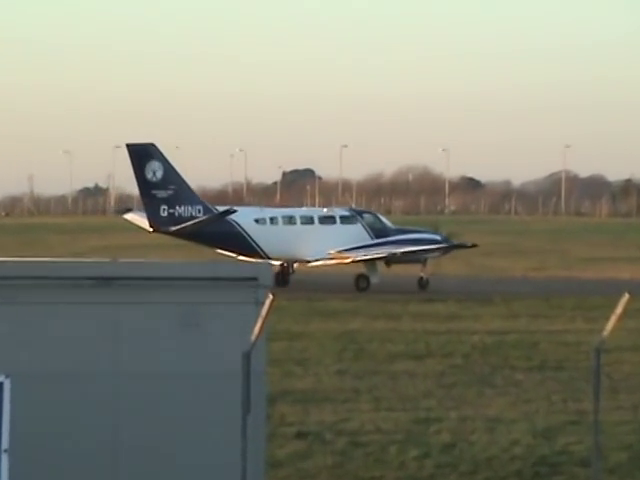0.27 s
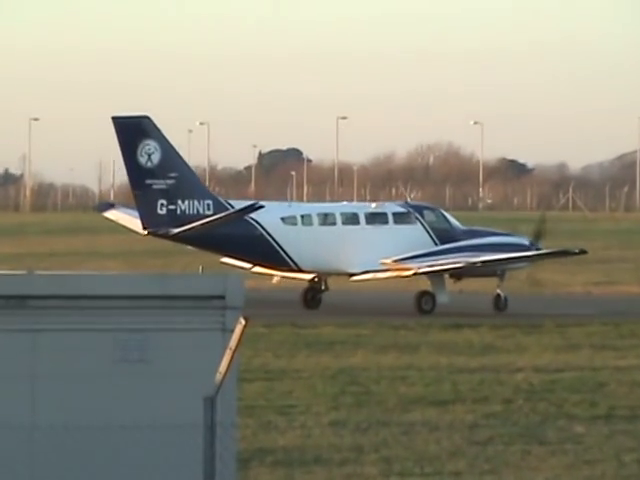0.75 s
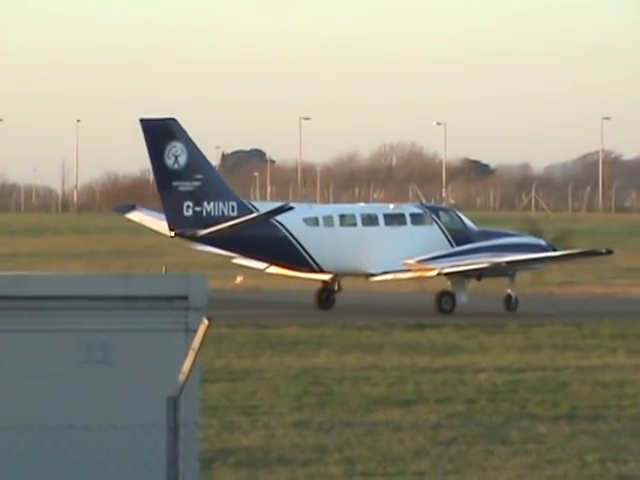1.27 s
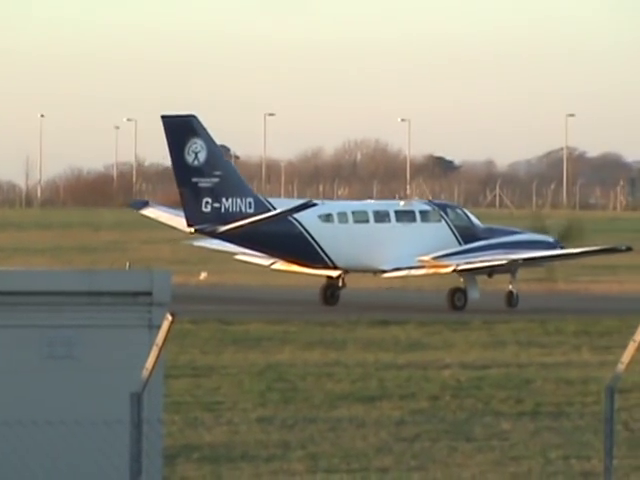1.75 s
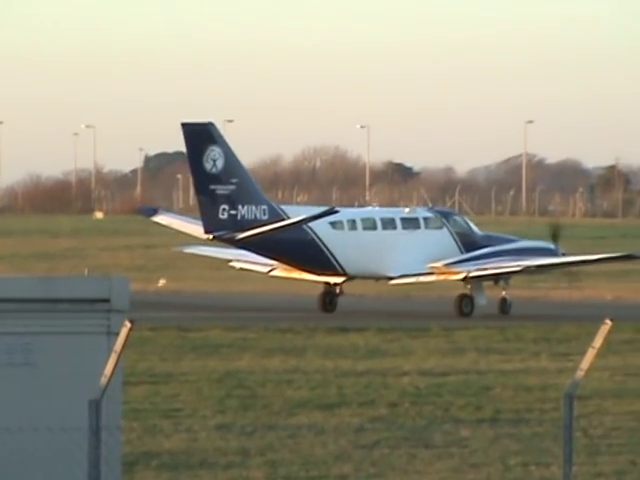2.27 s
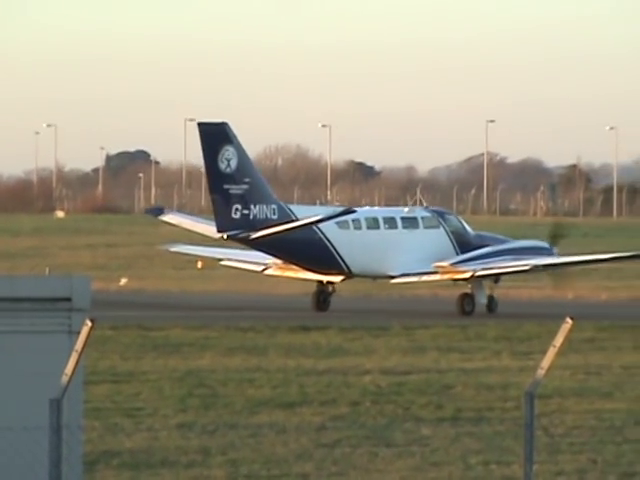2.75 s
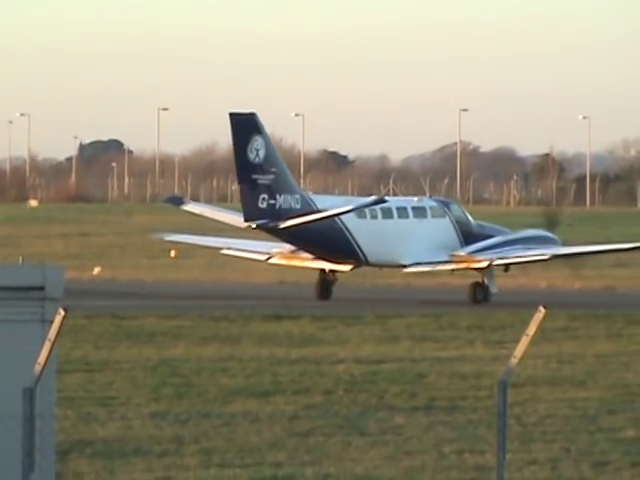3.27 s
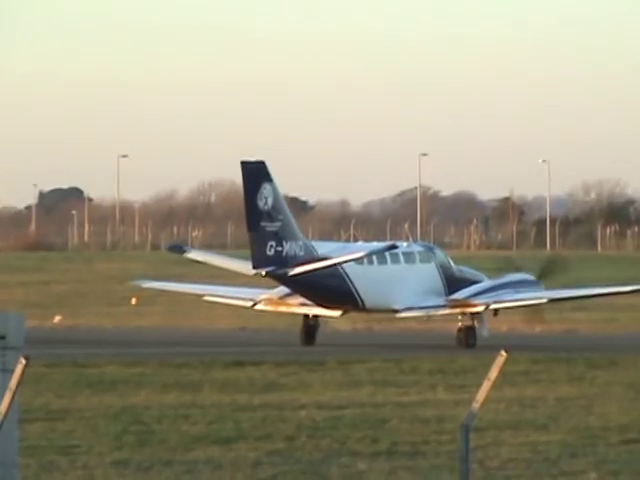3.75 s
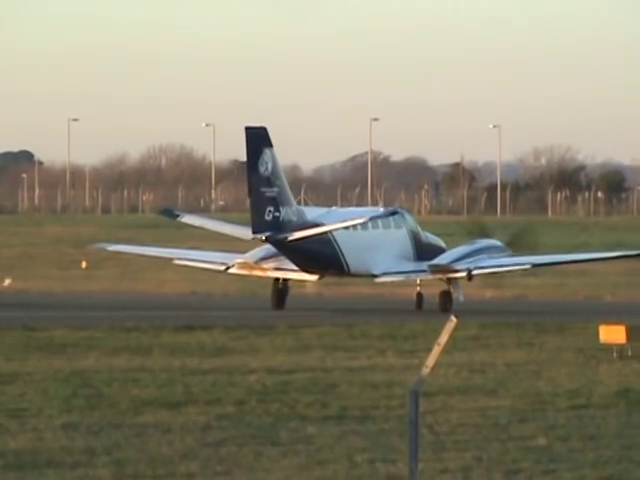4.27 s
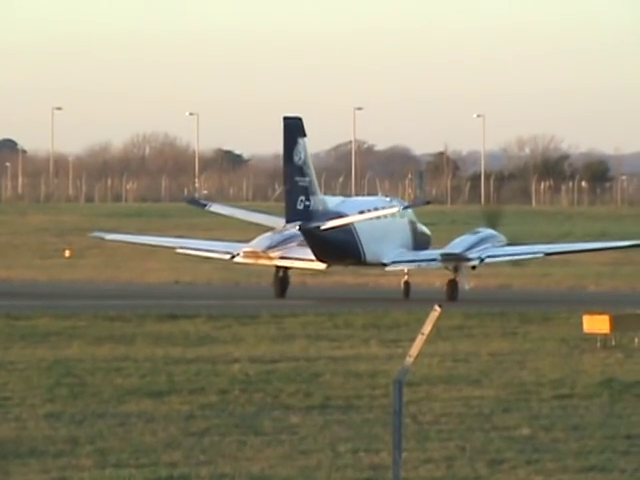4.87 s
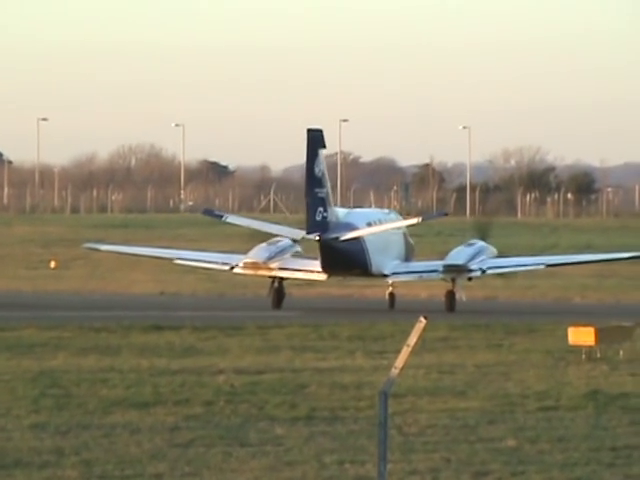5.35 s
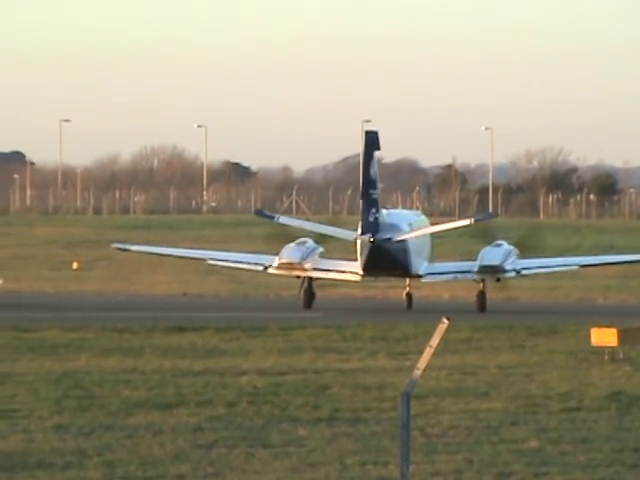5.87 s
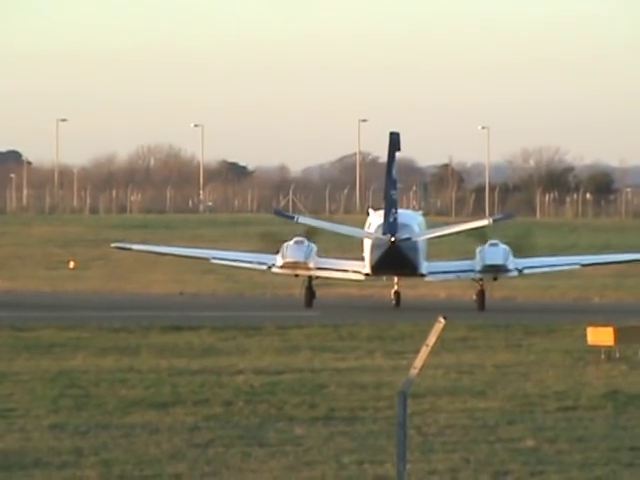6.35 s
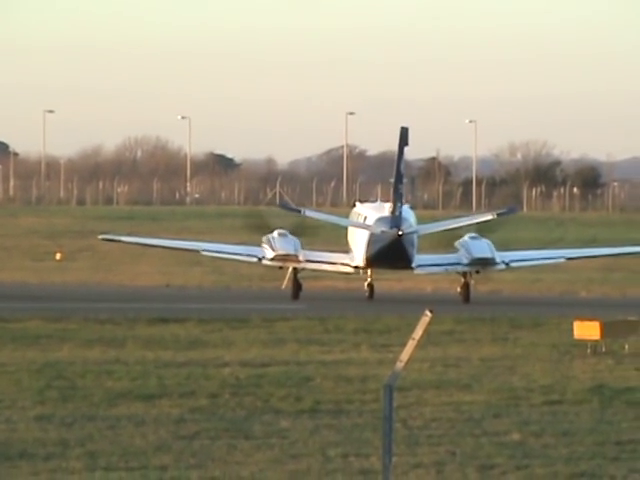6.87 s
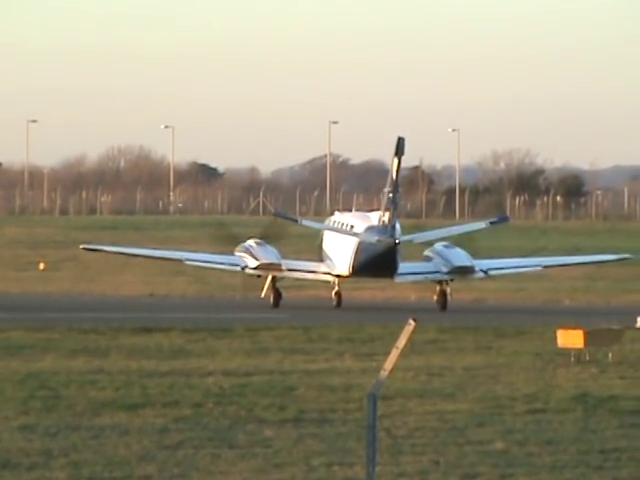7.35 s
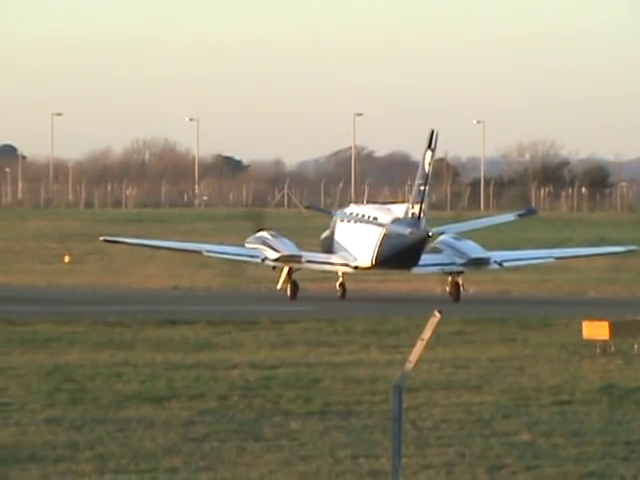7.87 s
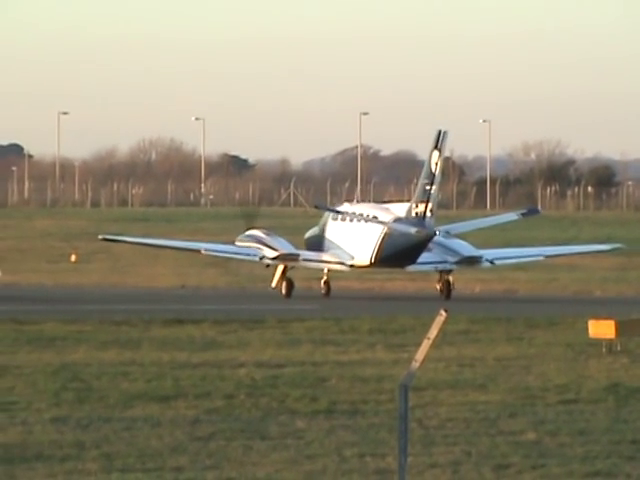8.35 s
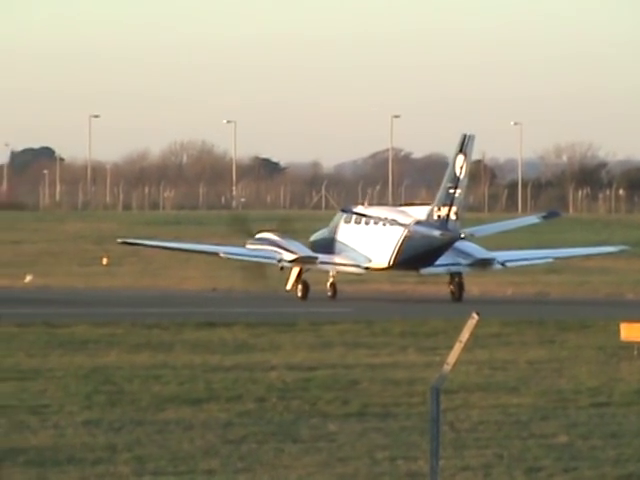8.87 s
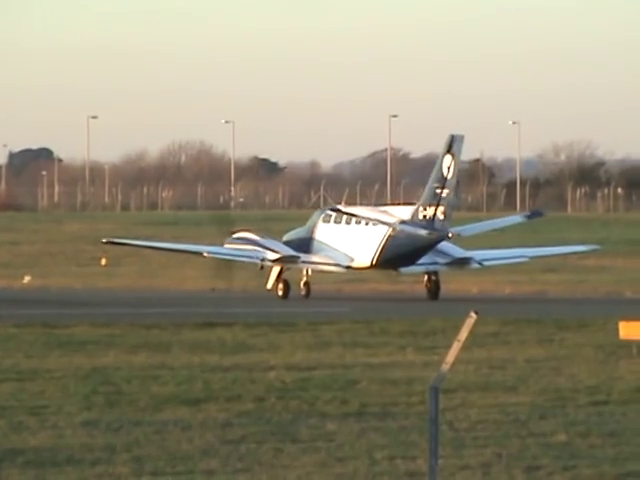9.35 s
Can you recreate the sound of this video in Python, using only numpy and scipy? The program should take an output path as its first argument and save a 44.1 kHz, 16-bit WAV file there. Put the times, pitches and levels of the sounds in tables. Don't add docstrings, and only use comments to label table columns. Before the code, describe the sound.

Outdoors on a grass airfield, a small twin-propeller aircraft taxis by with a rough, fluttering drone. Rapid bright exhaust ticks and metallic clatter stand out early, then fade as its tail swings toward the listener and the roar grows smoother. Wind buffets the camera microphone near the middle, with low thumps. Late on, a bird chirps faintly to the right over the continuing engines.

```python
import sys
import numpy as np
from scipy import signal
from scipy.fft import rfft, irfft, next_fast_len
from scipy.io import wavfile
from scipy.ndimage import uniform_filter1d

SR = 44100
rng = np.random.default_rng(int(sys.argv[2]) if len(sys.argv) > 2 else 0)


def gain_from_decibels(decibels):
    exponent = np.asarray(decibels, float) / 20
    return 10 ** exponent


def wav_record(signal):
    frames = np.transpose(np.atleast_2d(signal))
    bounded = np.clip(frames, -1, 1)
    quanta = np.round(bounded * 32767).astype(np.int16)
    wavfile.write(sys.argv[1], SR, quanta)


N = 423801
TIME = np.arange(N) / SR
STEP = 16

CYLINDERS_DB = [1, 1.5, -3, 1, -5, -0.5]


def aircraft():
    # [t/s, firings per s]
    near_rate = [(0.0, 51.364), (0.8, 52.074), (2.0, 52.545), (3.2, 53.678), (3.6, 53.686), (4.4, 54.579),
                 (5.2, 55.819), (6.0, 56.071), (6.4, 55.654), (7.2, 56.584), (8.0, 56.339), (9.61, 57.11)]
    far_rate = [(0.0, 51.394), (0.8, 51.194), (2.0, 50.683), (2.4, 50.899), (3.2, 50.494), (4.0, 51.006),
                (4.8, 50.735), (6.0, 51.693), (6.4, 52.245), (7.6, 52.366), (8.0, 52.93), (9.61, 53.215)]
    # [order of the six-firing cycle, heading/deg, half-width/deg, level/dB]
    near_lobes = [(6, 83, 14, -42), (6, 33, 23, -30), (6, -15, 63, -32.5), (12, 63, 22, -28),
                  (12, 13, 28, -26.5), (12, -22.5, 35, -27.5), (15, 85.5, 5.9, -38), (15, 43, 7.4, -34),
                  (15, 31, 28, -30), (15, -2, 15, -32), (15, -57.5, 8, -34), (18, 74, 10.2, -24),
                  (18, 48, 23.6, -26), (18, -3, 23, -38.5), (18, -57, 19, -41)]
    far_lobes = [(6, 84, 14, -40), (6, 49, 29, -34), (6, -52.5, 70, -36), (12, 54.5, 27, -37),
                 (12, 19.5, 19, -32.5), (12, -17.5, 15, -34), (12, -50, 10, -45.5), (15, 52, 6, -46.5),
                 (15, 3, 18, -50), (15, -22, 5.6, -38.5), (18, 83.5, 12, -25.5), (18, 49, 25.7, -26.5),
                 (18, 11, 28, -29.5), (18, -58.5, 30.5, -32.5)]
    # [t/s, level/dB]
    noise_level = [(0.0, -33), (0.05, -37), (0.18, -34), (0.21, -35), (1.15, -35), (1.18, -34.5),
                   (1.23, -35.5), (1.58, -35.5), (2.03, -38.5), (2.06, -35.5), (2.14, -37), (4.28, -37),
                   (5.24, -34.5), (6.4, -37), (7.15, -42.5), (7.9, -39), (8.08, -40), (9.61, -40.5)]
    near = firings(near_rate, 0.36)
    far = firings(far_rate, 0)
    level_db = curves(noise_level)[0]
    air_db = 0.75 * wobble(11)
    sound = exhaust_ticks(near) + clatter(near) + roar(near, level_db + air_db)
    sound = tailplane_shade(sound)
    sound += propellers(near, far, level_db + air_db) + rumble() + wing_wash(air_db)
    return sound, exhaust(near, near_lobes) + exhaust(far, far_lobes)


def firings(rate, start):
    return start + np.cumsum(curves(rate)[0]) / SR


def exhaust(fired, lobes):
    # [order, level/dB re the nearer of orders 12 and 18]
    uneven = [(3, -37), (5, -14.5), (7, -16), (8, -17), (9, -14.5), (10, -24), (13, -16), (16, -9),
              (17, -9.5), (20, -19.5), (21, -16.5), (22, -19), (23, -17.5), (24, -17.5), (25, -18),
              (26, -28.5), (32, -38.5)]
    strong = {}
    for k in (6, 12, 15, 18):
        strong[k] = beam([row[1:] for row in lobes if round(row[0]) == k])[::STEP]
    out = 0
    for order in range(3, 33):
        turn = np.pi / 3 * order * fired[::STEP]
        lag = 0.42 * max(order - 12, 0) - 2.1 * (order % 2)
        drift, luck = wobble(4, size=STEP), rng.uniform(0, 2 * np.pi)
        if order in strong:
            level_db = strong[order] + 0.5 * drift
            phase = turn - lag + 0.053 * wobble(11, size=STEP)
        else:
            high = np.clip((order - 12) / 6, 0, 1)
            level_db = (1 - high) * strong[12] + high * strong[18]
            level_db = level_db + np.interp(order, *np.round(np.transpose(uneven))) + 1.6 * drift
            phase = turn - (luck if order % 3 else lag) + 0.3 * wobble(2, size=STEP)
        out += gain_from_decibels(level_db) * np.cos(phase)
    return gain_from_decibels(3) * signal.resample_poly(out, STEP, 1, padtype="edge")[:N]


def exhaust_ticks(near):
    # [f/Hz, level/dB per Hz]
    colour = [(2500, -30.5), (4500, 5), (6000, 0.5), (8000, 2), (9300, -5), (10500, -21.5), (12500, -41)]
    # [heading/deg, half-width/deg, level/dB]
    lobes = [(68.5, 9, -48), (55.5, 12.5, -51), (40, 14, -53), (9, 20, -56.5), (-26, 22, -73),
             (-56, 6, -60.5)]
    # [t/s, half-length/s, level/dB]
    surges = [
        (.1, 0.058, -6),
        (.48, 0.1, 6),
        (1.16, 0.13, 5.5),
        (1.68, 0.12, 4.5),
        (2.06, .04, 2.5),
        (2.55, 0.19, -2.5),
        (2.95, 0.24, 4.5),
        (4.03, 0.017, 9.5),
    ]
    count = near + 0.17
    puffs = bursts(count, rise=0.16, fall=0.27, scatter_db=3, pattern_db=CYLINDERS_DB)
    level_db = beam(lobes) + swells(surges) - 1 + 0.3 * wobble(27)
    sound = gain_from_decibels(level_db) * hiss(colour, puffs, echo_hz=695, bounce=0.24)
    dull = filtered(sound, lambda hz: 1 / (1 + (hz / 6470) ** 12))
    chance = np.clip(rng.standard_normal(600), -1.5, 1.5)[np.floor(count).astype(int)]
    tilt_db = 4.5 * chance + 1 - side_view()
    return dull * gain_from_decibels(-tilt_db) + (sound - dull) * gain_from_decibels(tilt_db)


def clatter(near):
    # [f/Hz, level/dB per Hz]
    colour = [(900, -36), (1500, -11), (2200, 6), (3200, 9), (4500, -2.5), (6000, -47.5)]
    # [heading/deg, half-width/deg, level/dB]
    lobes = [(70.5, 0.24, -33.5), (69.5, 4.1, -41.5), (62, 15, -48.5), (18, 23, -47), (-54, 8.3, -55)]
    clacks = bursts(near + 0.22, rise=0.13, fall=0.47, scatter_db=3.5, pattern_db=CYLINDERS_DB)
    level_db = beam(lobes) + 1.2 * wobble(2.6)
    return gain_from_decibels(level_db) * hiss(colour, 0.1 + clacks, echo_hz=704, bounce=0.47)


def roar(near, level_db):
    # [f/Hz, level/dB per Hz]
    side_colour = [(180, -39), (300, 0.5), (399, -5.5), (811, 0.5), (1060, -9.5), (1200, 2), (1620, -2),
                   (2130, -4.5), (2440, -8.5), (2790, -3.5), (4590, -22.5), (8390, -23.5), (11000, -48),
                   (14300, -76), (22000, -120)]
    astern_colour = [(180, -57), (300, -10), (471, -2), (609, -4.5), (1020, -3.5), (1130, -5), (2550, -14),
                     (2790, -15.5), (7320, -27), (11000, -42), (14300, -71), (22000, -120)]
    # [f/Hz, width/Hz, lift/dB]
    cowl = [(650, 52, -5), (820, 25, 3.5), (1350, 96, 1.5), (2140, 78, 5), (2760, 110, 1)]
    # [heading/deg, half-width/deg, level/dB re the engine noise]
    lobes = [(67.5, 59.5, 0.5), (-11.5, 19.6, 0.5), (-49, 16.2, 0)]
    side = np.clip(side_view(), 0, 1)
    pulses = bursts(near + 0.2, rise=0.27, fall=0.49, scatter_db=5.5)
    side_on = hiss(side_colour, 1.4 + pulses, echo_hz=704, bounce=0.1)
    side_on = filtered(side_on, lambda hz: 0.76 * bumps(cowl, hz))
    astern = hiss(astern_colour, echo_hz=664, bounce=0.21)
    blend = np.sqrt(side) * side_on + np.sqrt(1 - side) * astern
    return gain_from_decibels(level_db + beam(lobes) - 0.5 + 0.84 * side * wobble(17)) * blend


def tailplane_shade(sound):
    shade = 0.61 * np.exp(-((heading_deg() - 33.3) / 7.1) ** 2)
    band = filtered(sound, lambda hz: np.exp(-0.5 * ((hz - 4600) / 590) ** 2))
    return sound - shade * band


def propellers(near, far, level_db):
    # [f/Hz, level/dB per Hz]
    colour = [(240, -20), (400, -24.5), (697, 2), (907, -6), (1230, -0.5), (1470, -2), (1940, -3.5),
              (7160, -24.5), (11000, -43.5), (14300, -63.5), (22000, -120)]
    # [heading/deg, half-width/deg, level/dB re the engine noise]
    near_lobes = [(70, 16, -6), (47, 26, -6.5), (13, 16.5, 1), (-50, 8.4, -6.5)]
    far_lobes = [(24, 87, -16.5), (-20.5, 6, -5), (-33.5, 4.75, -0.5), (-40, 6.5, -1.5)]
    out = 0
    for fired, lobes in ((near + 1.226, near_lobes), (far + 1.28, far_lobes)):
        passes = bursts(fired / (3 / 2), rise=0.23, fall=0.21, scatter_db=2.4)
        out += gain_from_decibels(level_db + beam(lobes)) * hiss(colour, 0.76 + passes, echo_hz=652, bounce=0.097)
    return out


def rumble():
    # [f/Hz, level/dB per Hz]
    colour = [(20, -33), (35, -25), (60, 2.5), (90, -3.5), (120, -2.5), (170, 1), (230, -7.5), (300, -19.5),
              (450, -50)]
    # [heading/deg, half-width/deg, level/dB]
    lobes = [(81, 68, -36.5), (12, 32, -38.5), (-32.5, 34, -34)]
    return gain_from_decibels(beam(lobes)) * hiss(colour)


def wing_wash(air_db):
    # [f/Hz, level/dB per Hz]
    colour = [(2800, -25), (4300, 7), (5800, -6), (8000, -22.5)]
    # [heading/deg, half-width/deg, level/dB]
    lobes = [(-51, 4.6, -54)]
    return gain_from_decibels(beam(lobes) + air_db) * hiss(colour)


def heading_deg():
    # [t/s, heading/deg]
    turn = [
        (0, 80),
        (3, 55),
        (6.3, 0),
        (9.61, -55),
    ]
    return curves(turn)[0]


def side_view():
    return (np.maximum(heading_deg(), 0) / 74.6) ** 1.14


def beam(lobes):
    heading = heading_deg()[::64]
    power = sum(gain_from_decibels(2 * db - 12 * ((heading - at) / width) ** 2) for at, width, db in lobes)
    return np.interp(TIME, TIME[::64], 10 * np.log10(power + 1e-7))


def bursts(count, rise, fall, scatter_db, pattern_db=(0,)):
    whole = np.floor(count).astype(int)
    size_db = scatter_db * np.clip(rng.standard_normal(600), -2, 1.6) + np.resize(pattern_db, 600)
    u = count - whole
    return unit(gain_from_decibels(size_db)[whole] * (1 - np.exp(-(u / rise) ** 2)) * np.exp(-u / fall))


def hiss(spectrum, gate=1, echo_hz=700, bounce=0):
    closed = [(1, -120)] + list(spectrum) + [(SR / 2, -120)]

    def response(hz):
        echo = np.exp(-2j * np.pi * hz / echo_hz)
        return gain_from_decibels(along(closed, hz)) * (1 + bounce * echo) / (1 - 0.036 * echo)

    return unit(filtered(gate * rng.standard_normal((2, N)), response))


def wind():
    # [t/s, level/dB]
    breeze = [(0, -57.5), (4.8, -48), (6.5, -45), (7.6, -43), (9.61, -47)]
    # [t/s, half-length/s, level/dB over the breeze]
    gusts = [
        (5.55, 0.12, 23.5),
        (5.83, .1, 24),
        (6.07, 0.1, 17),
    ]
    # [f/Hz, level/dB per Hz]
    colour = [(20, -25.5), (32, -21), (60, 7), (150, -15.5), (300, -23), (500, -50)]
    lumps = gain_from_decibels(3 * np.array([wobble(14), wobble(14)]))
    return gain_from_decibels(curves(breeze)[0] + swells(gusts)) * unit(lumps * hiss(colour))


def bird():
    # [t/s, length/s, from f/Hz, to f/Hz, level/dB]
    chirps = [
        (8.637, 0.051, 3250, 2700, -48),
        (8.701, 0.042, 2750, 2550, -47),
        (9.092, .055, 3450, 2510, -44),
        (9.177, 0.063, 3200, 2450, -45.5),
        (9.54, 0.039, 2950, 2320, -52),
    ]
    out = np.zeros(N)
    for s, length, from_hz, to_hz, db in chirps:
        u = np.clip((TIME - s) / length, 0, 1)
        pitch_hz = from_hz + (to_hz - from_hz) * u ** 1.46
        out += gain_from_decibels(db) * np.sin(np.pi * u) * np.sin(2 * np.pi * np.cumsum(pitch_hz) / SR)
    return out * np.array([[0.3], [1.4]])


def ports(pair, tones):
    # [f/Hz, left-right level/dB]
    lean = [(60, -6.5), (110, -9), (200, -10.5), (380, -4.0), (700, -5), (1290, -1.5), (2380, 0), (4400, 3),
            (8120, 0), (15000, -2)]
    # [f/Hz, lead/rad]
    lead = [(0, 0), (340, -0.77), (600, -0.21), (1030, 0.99), (1380, 0.23), (1890, 0.6), (2240, -0.35),
            (3270, 0.2), (3530, 0.5), (4390, 0.2), (5340, -0.2), (7750, 0.28), (8870, 0.1), (15200, -0.0)]
    # [f/Hz, likeness 0-1]
    alike = [(60, 0.23), (130, 1), (290, 0.14), (640, 0.79), (1410, 0.79), (3100, 0.74), (6820, 0.78),
             (15000, 0.67)]
    # [f/Hz, width/Hz, depth/dB]
    dips = [(1017, 150, -0.5), (1476, 26.4, -8), (2350, 53, -3.5), (3770, 38, -2), (4530, 106, -5.5),
            (5410, 64, -6)]

    def spread(hz):
        turn = np.arccos(np.clip(along(alike, hz) + 0.1, 0, 1)) / 2
        return np.array([np.cos(turn), np.sin(turn)])

    def balance(hz):
        tilt = gain_from_decibels(along(lean, hz) / 2) * np.exp(0.5j * along(lead, hz))
        share = 2 * bumps(dips, hz) / abs(tilt + 1 / tilt)
        return share * np.array([tilt, 1 / tilt])

    mid, side = filtered(pair, spread)
    return filtered(tones + np.array([mid + side, mid - side]), balance)


def guard(x):
    # [t/s, strength level/dB]
    trips = [(.063, -33.7), (1.098, -30), (1.334, -32.3), (1.558, -34), (1.634, -32.7), (1.785, -27),
             (2.318, -24), (2.356, -29), (2.77, -28), (3.144, -31), (3.377, -24), (3.481, -31.8),
             (3.601, -23), (3.716, -29), (3.815, -30), (4.09, -27), (4.661, -32), (4.743, -25.9),
             (4.853, -35), (5.068, -31.2), (5.592, -23), (5.827, -21.3), (5.969, -32), (6.048, -26),
             (6.183, -31.5), (6.321, -32), (6.433, -22), (6.47, -24.2), (7.254, -31), (7.543, -27)]
    duck, kick = np.zeros(N), np.zeros(N)
    for s, db in list(trips) + light_trips(x[1], count=44):
        span = slice(max(round(s * SR) - SR // 100, 0), round(s * SR) + SR // 4)
        since = np.maximum(TIME[span] - s + 0.001, 0)
        depth = np.clip((db + 36.5) / 19, 0, 1)
        dip = depth * (1 - np.exp(-(since / 0.0012) ** 2)) * np.exp(-since / 0.039)
        duck[span] = np.maximum(duck[span], dip)
        kick[span] += gain_from_decibels(db + 11) * np.exp(-0.5 * ((TIME[span] - s) / 0.00077) ** 2)
    bass = filtered(x[0] - x[1], lambda hz: 1 / (1 + (hz / 500) ** 4))
    kick = filtered(kick, lambda hz: hz ** 2 / (hz ** 2 + 45 ** 2))
    return x + duck * bass / 2 * np.array([[-1], [1]]) + kick * np.array([[1], [-1]])


def light_trips(x, count):
    place, size = rng.uniform(size=count), rng.standard_normal(count)
    start = ((N - SR // 25) * place ** 1.25).astype(int)
    nearby = start[:, None] + np.arange(SR // 25)
    troughs = nearby[np.arange(count), x[nearby].argmin(axis=1)]
    return list(zip(troughs / SR, -32.5 + 1.5 * size))


def amplifier_hiss():
    # [f/Hz, level/dB per Hz]
    colour = [(300, 26), (3000, 8.5), (10000, 1), (16000, 3.2)]
    common, apart = hiss(colour)
    return gain_from_decibels(-58) * np.array([common + 0.35 * apart, common - 0.34 * apart])


def unit(x):
    return x / np.sqrt(np.mean(x ** 2) + 1e-20)


def along(points, hz):
    f, v = np.transpose(points)
    return np.interp(np.log(hz + 1), np.log(f + 1), v)


def curves(rows):
    s, *cols = np.transpose(rows)
    return [np.interp(TIME, s, c) for c in cols]


def wobble(rate, size=1):
    knots = uniform_filter1d(rng.standard_normal(400), size=2) * np.sqrt(2)
    return np.interp(TIME[::size] * rate, np.arange(len(knots)), knots)


def swells(rows):
    return sum(db * np.exp(-((TIME - s) / half) ** 2) for s, half, db in rows)


def bumps(rows, hz):
    return gain_from_decibels(sum(db * np.exp(-0.5 * ((hz - at) / width) ** 2) for at, width, db in rows))


def filtered(x, response):
    m = next_fast_len(N + 8192)
    return irfft(rfft(x, m) * response(np.fft.rfftfreq(m, 1 / SR)), m)[..., :N]


def scene():
    return ports(*aircraft()) + wind() + bird()


def top_cut(x):
    return signal.sosfilt(signal.butter(12, 15630, fs=SR, output="sos"), x)


def record(dry):
    noise = amplifier_hiss()
    return top_cut(guard(dry) + noise)


dry = scene()
out = record(dry)
wav_record(out)
```